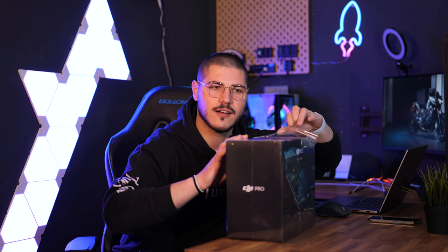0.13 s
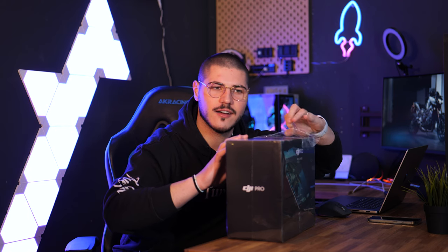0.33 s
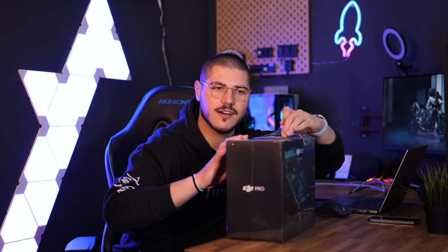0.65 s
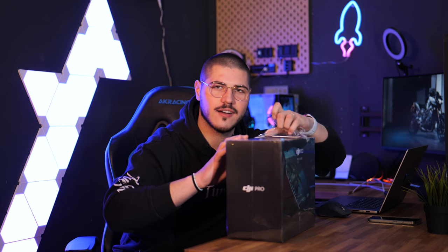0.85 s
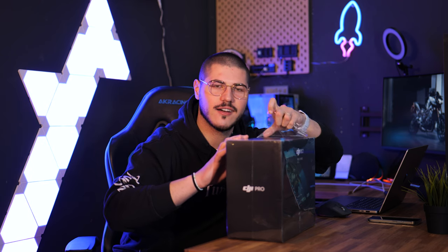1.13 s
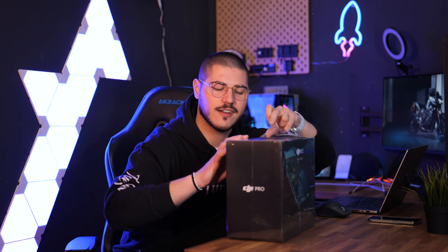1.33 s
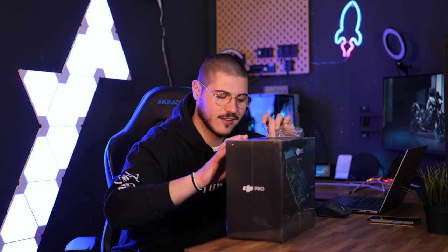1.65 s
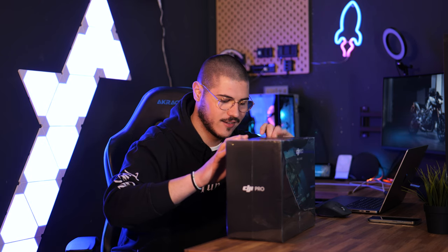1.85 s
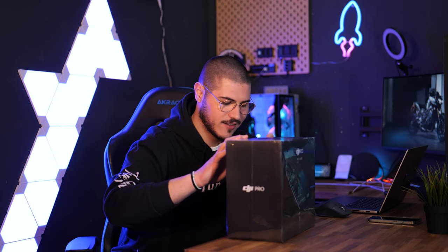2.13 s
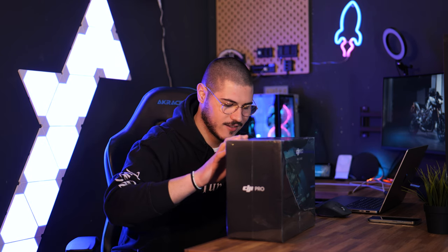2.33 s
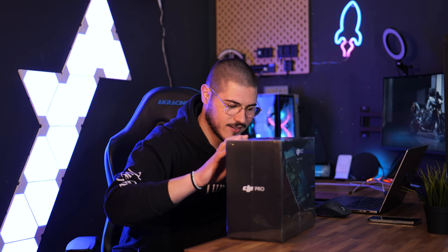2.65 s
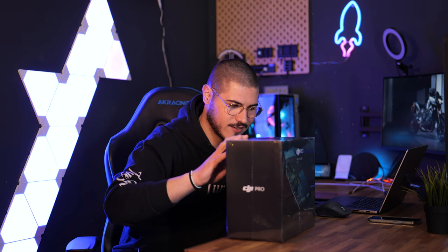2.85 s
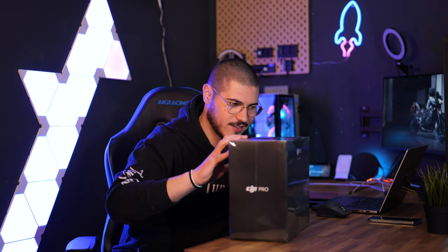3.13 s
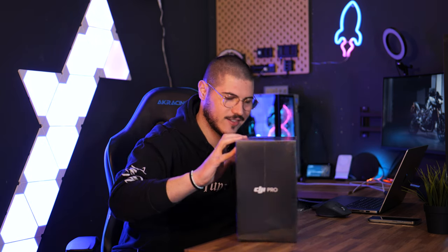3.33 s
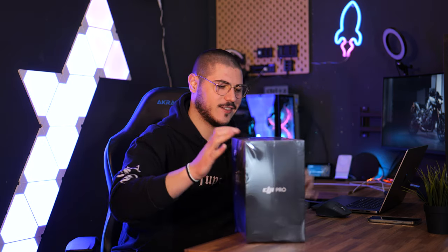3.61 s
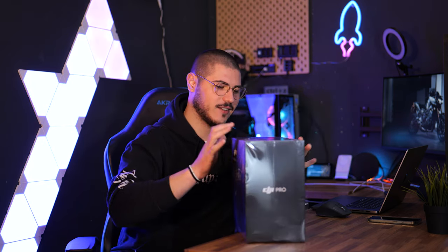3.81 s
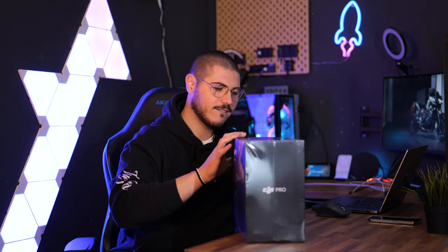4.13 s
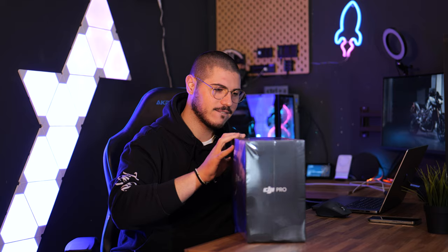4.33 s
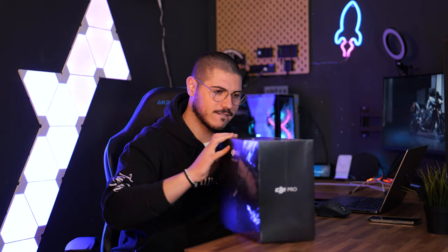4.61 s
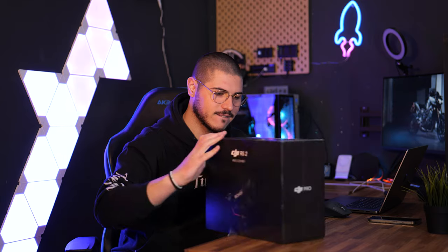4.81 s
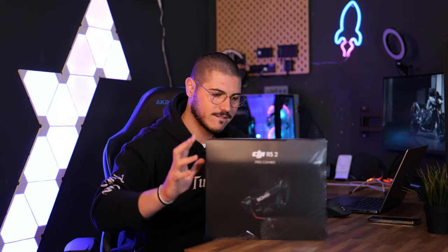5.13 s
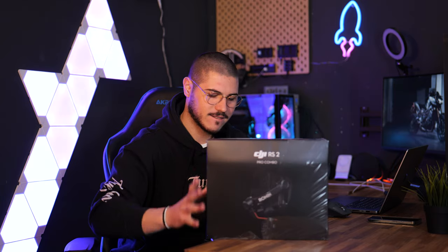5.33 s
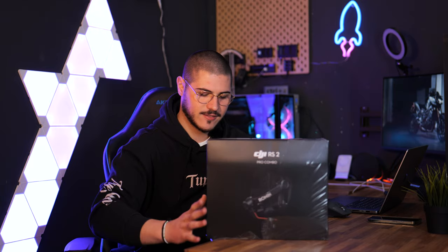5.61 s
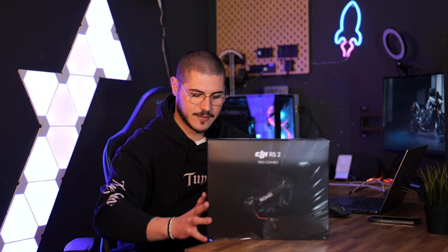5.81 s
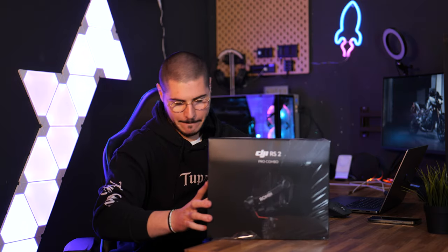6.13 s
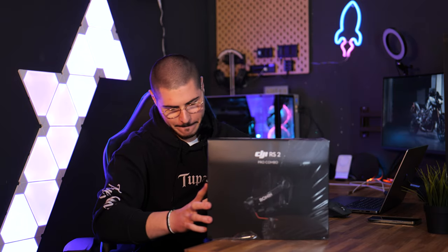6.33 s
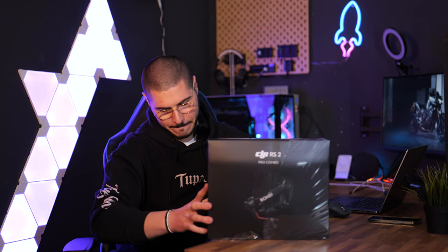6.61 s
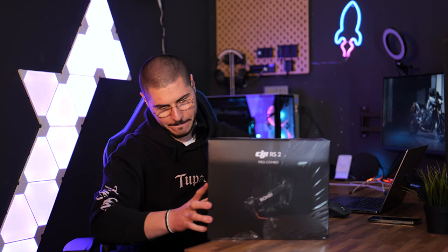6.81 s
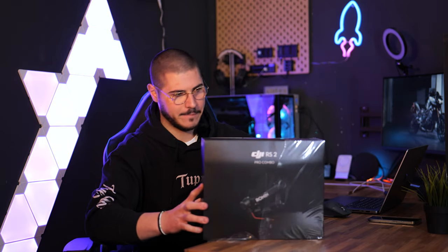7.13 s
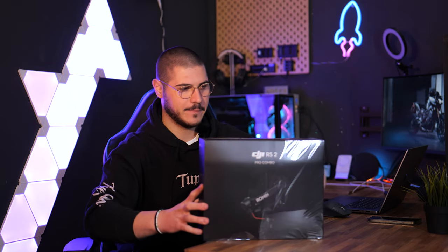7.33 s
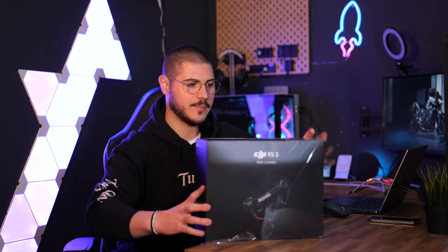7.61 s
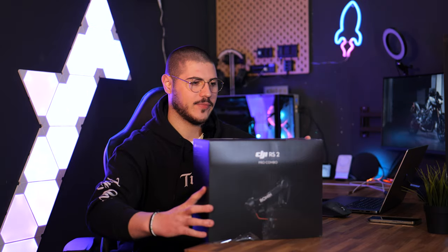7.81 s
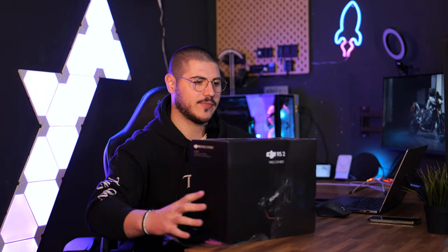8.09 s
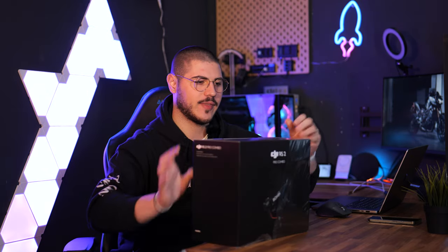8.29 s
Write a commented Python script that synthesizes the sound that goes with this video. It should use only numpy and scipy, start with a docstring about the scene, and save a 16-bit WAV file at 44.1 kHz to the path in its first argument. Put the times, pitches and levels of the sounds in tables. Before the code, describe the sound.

Close to the microphone in a small room, fingers pick at tight plastic wrap on a cardboard box. Bright crinkles and rapid rubbery creaks come first, then irregular crackles and soft hollow knocks. After a quieter patch the film lets go with one very loud, sharp snap and a quick rebound. Looser rustling, a swelling rub and small ticks follow, fading down.

```python
"""Shrink-wrap is picked open and peeled off a cardboard box in a small room, one microphone close by.
The film crinkles throughout in countless tiny ringing buckles, and early on creaks in plucked slips.
Louder cracks and needle-sharp kinks stand out; the stretched film lets go with a sharp snap and rebounds.
The box beneath rustles as filtered buckles and knocks as damped rings that set its modes going.
Behind it lie a short diffuse room tail and quiet filtered noise."""
import sys
import numpy as np
from scipy import signal
from scipy.fft import rfft, irfft, next_fast_len
from scipy.io import wavfile
from scipy.ndimage import uniform_filter1d

SR = 44100
rng = np.random.default_rng(int(sys.argv[2]) if len(sys.argv) > 2 else 0)


def file_out(sig):
    """Save sig as 16-bit WAV at sys.argv[1]."""
    # one column per channel
    cols = np.atleast_2d(sig).T
    # limit, then scale
    lim = np.clip(cols, -1, 1)
    pcm = np.round(lim * 32767).astype(np.int16)
    wavfile.write(sys.argv[1], SR, pcm)


N = 373086

# ring of the film, higher where it is taut: start_s [s], crease_hz [Hz], fold_hz [Hz]
TAUTNESS = [(0, 8160, 2630), (1.1, 8760, 2480), (2.2, 7700, 2920), (2.7, 7040, 1690), (3.6, 6800, 1400),
            (4.3, 7150, 3370), (4.75, 9150, 3340), (5.4, 6900, 3400), (6.3, 7300, 3800), (6.8, 8050, 2800),
            (7.2, 6940, 2040), (8.46, 7000, 2670)]
# steady handling of the wrap: start_s [s], effort_db [dB], crispness_db [dB, creases above folds],
# cardboard_db [dB, above effort]
HANDLING = [(0, -55, 4, -5), (.78, -51, 4.5, -8), (1.55, -44.5, 2.5, -7.5), (1.77, -50, 4.5, -9.5),
            (1.92, -47, -5.5, -2), (2.55, -51, 2.5, 3.5), (3.16, -48, 7.5, -1), (3.25, -54.5, 2.5, 1),
            (3.6, -49.5, 3, -3), (3.93, -66, 3.5, 2.5), (4.25, -54, 0, -5.5), (5.0, -52.5, -7, 0),
            (5.48, -49, -5.5, 1.5), (6.2, -62, -10, -0.5), (6.6, -54.5, -2, -3.5), (7.62, -63.5, 1.5, 1),
            (7.88, -55.5, 3, 2), (8.46, -66.5, 0, -4.5)]
# fingers tugging at the film: start_s [s], length_s [s], effort_db [dB], crispness_db [dB]
TUGS = [(.01, 0.026, -45, 5), (0.104, 0.012, -44.5, 12), (0.197, 0.11, -45, 2.5), (0.328, 0.011, -43.5, 11),
        (0.458, 0.084, -40, -2.5), (0.638, 0.054, -41.5, -2), (0.887, 0.099, -39.5, 3.5),
        (1.006, 0.31, -43.5, 5), (1.592, 0.06, -45, 4.5), (1.868, 0.04, -43, 2), (1.931, 0.017, -39.5, -8),
        (2.079, 0.0092, -39.5, -3), (2.161, 0.0084, -40, -4), (2.252, 0.035, -42, -5.5),
        (2.316, 0.067, -49, -3), (2.764, 0.063, -42, 5), (3.002, 0.082, -44, 1.5),
        (3.334, 0.036, -44.5, 2.5), (5.358, 0.084, -48.5, -4), (5.731, 0.14, -51, -11.5),
        (5.886, 0.026, -40.5, -10.5), (6.72, 0.27, -49, 1), (7.331, 0.12, -51.5, 8), (7.759, .08, -50, 1),
        (7.992, 0.12, -57, 11.5)]
TUG_ATTACK_S, TUG_RELEASE_S = 0.0045, 0.012
# a hand or the table rubbing along the wrap: peak_s [s], half_width_s [s], effort_db [dB], crispness_db [dB]
RUBS = [(3.49, 0.045, -45, 5), (4.24, 0.069, -63, 16), (4.789, 0.038, -42, -1.5), (6.0, 0.02, -55.5, -16),
        (6.44, 0.074, -53, -13), (7.17, 0.1, -41.5, 5.5), (8.24, .055, -46.5, 8)]
# how freely the film slides, rasping at 0 dB and only ticking far below: start_s [s], level_db [dB]
SLIDING = [(0, -12), (.85, -13), (.9, -3), (1.05, -8), (1.25, -3), (2.3, -13), (2.8, -6), (4.2, -4),
           (5.7, -13), (6.3, -9), (6.9, -2), (8.46, -4)]
# ticks per second when sliding is at 0 dB, and the scale of their exponential size spread
TICKS_PER_S, TICK_SPREAD_DB = 1300, 4.4
# spectra of the tight creases, slack folds and cardboard: pitch_hz [Hz], level_db [dB]
CREASE_SPECTRUM = [(1500, -20.5), (4000, -2), (7000, -2.5), (11000, 1), (16000, -5)]
FOLD_SPECTRUM = [(500, -13.5), (1400, -5), (4000, 5.5), (9000, 6), (16000, -1)]
CARDBOARD_SPECTRUM = [(60, -39.5), (200, -3), (350, -3.5), (600, 0), (900, 2.5), (1300, 3.5), (2000, -8.5),
                      (3000, 4), (6000, -54)]
# boom of the box where fingers press on it: start_s [s], level_db [dB, above the cardboard's rustle]
GRIP = [(0, -2), (1.15, 1), (2.8, -9.5), (4.0, -1), (5.7, -14), (6.6, -1), (7.2, -18.5), (7.8, -0.5),
        (8.2, -8.5)]
# spectrum of that boom: pitch_hz [Hz], level_db [dB]
BOOM_SPECTRUM = [(25, -29), (50, -14), (80, -5.5), (160, 1), (260, -0.5), (400, -4), (1000, -33)]
# film sticking and slipping over the lid: start_s [s], length_s [s], first_rate [slips/s],
# last_rate [slips/s], first_level_db [dB], last_level_db [dB], pitch_hz [Hz]
CREAKS = [(0.2268, 0.075, 268, 69, -31, -21, 1860), (0.339, 0.027, 85, 64, -21.5, -26.5, 1810),
          (0.4582, 0.041, 242, 265, -25.5, -27, 2300), (0.5176, 0.0075, 230, 230, -23.5, -29, 2220),
          (0.6128, .0234, 180, 120, -19.5, -34, 3030), (.6498, 0.0078, 240, 200, -23.5, -29, 2570),
          (1.177, 0.055, 160, 135, -32, -28, 2000), (2.258, 0.028, 125, 105, -42, -42, 2200),
          (2.4, 0.058, 38, 38, -29.5, -27.5, 2176)]
CREAK_PITCH_FOLLOWS = 0.14  # the ring rises with the slip rate, by this power
# spectrum of one slip's tick: pitch_hz [Hz], level_db [dB]
SLIP_SPECTRUM = [(50, -21), (200, -21), (700, -4), (1100, 2.5), (1550, 13), (2300, 12.5), (3000, 14.5),
                 (4200, -21), (6500, 7), (9500, -2.5), (16000, -55)]
# single loud buckles: start_s [s], level_db [dB], pitch_hz [Hz]
CRACKS = [(0.0165, -22.5, 2690), (0.1098, -10.5, 8000), (0.1407, -15.5, 9050), (0.2143, -23, 5000),
          (0.2307, -13.5, 8500), (0.4835, -9, 9000), (.5695, -20.5, 2500), (.8532, -21.5, 7200),
          (0.9532, -11.5, 4850), (0.9628, -14, 10200), (0.9895, -10, 8250), (1.0143, -11.5, 9750),
          (1.1335, -11.5, 8400), (1.2724, -10, 7600), (1.2949, -13, 8700), (1.46, -15.5, 8100),
          (1.8079, -14, 3400), (1.9437, -6, 9300), (2.0082, -12, 9000), (2.085, -14.5, 3830),
          (2.1626, -15, 6470), (2.2283, -15, 9900), (2.3667, -19, 7100), (2.5608, -13, 8100),
          (2.6705, -17, 6050), (2.6755, -13.5, 7140), (2.925, -15.5, 9300), (3.1378, -21, 6800),
          (3.4175, -18, 7900), (3.8852, -27.5, 4300), (4.4596, -10, 5070), (4.614, -12.5, 9100),
          (5.099, -17, 8600), (5.108, -17, 4950), (5.1159, -19.5, 2500), (5.9113, -19, 5040),
          (6.306, -18.5, 7000), (6.7311, -14.5, 10000), (7.065, -15, 8300), (7.4023, -15, 7800),
          (7.7004, -22.5, 7060), (8.0742, -21.5, 7340)]
# the wrap snapping and rebounding: start_s [s], level_db [dB], pitch_hz [Hz]
SNAPS = [(5.286, 2, 3990), (5.3535, -5.5, 3820), (5.364, -24, 3860)]
# tiny kinks: how often, level above the creases' effort, spread of level, pitch ratio to the creases, spread
KINKS_PER_S = 24
KINK_DB, KINK_SPREAD_DB, KINK_PITCH, KINK_OCTAVES = 21, 2.5, 1.08, 0.21
# knocks on the box: start_s [s], level_db [dB], pitch_hz [Hz]
KNOCKS = [(0.2986, -31, 960), (0.5702, -37, 400), (0.9524, -26, 970), (1.125, -26.5, 800),
          (1.809, -24.5, 1110), (1.812, -27.5, 210), (2.0842, -23.5, 730), (2.231, -28, 520),
          (2.5172, -22, 607), (2.6704, -22, 900), (4.0094, -37.5, 427), (4.4597, -21.5, 830),
          (4.6149, -23, 815), (5.1149, -22.5, 680), (5.3646, -27, 725), (5.54, -31, 1120),
          (5.751, -31, 510), (6.3084, -28.5, 645), (6.5646, -27.5, 700), (6.569, -34.5, 200),
          (7.7587, -25, 513), (7.761, -30.5, 195)]
# every knock shakes the film: effort relative to the knock's level, crispness, time to settle to 1/e
SHAKE_DB, SHAKE_CRISP_DB, SETTLE_S = -18, -3.5, 0.017
# modes of the hollow box: pitch_hz [Hz], level_db [dB], t60_s [s, time to fall by 60 dB]
BOX_MODES = [(165.3, -25, 0.19), (228, -26.5, 0.12), (345.4, -28, 0.11), (491, -23.5, 0.1),
             (621, -24, 0.11), (1150, -24.5, .1)]
# spectra of the room tail and the room noise: pitch_hz [Hz], level_db [dB]
ROOM_SPECTRUM = [(60, -15), (200, -1), (1000, -3.5), (4000, -2), (9000, -4.5), (16000, -25)]
AIR_SPECTRUM = [(15, -49), (25, -19), (161, 11.5), (7110, -7.5), (16000, -13)]


def crinkle():
    """The same buckles sound in creases, slack folds and cardboard, over a fine rasp of sliding film."""
    t = np.arange(N) / SR
    crease_db, fold_db, card_db = curve(pull(t[::44]), t)  # pull is worked out about every millisecond
    crease_hz, fold_hz = curve(TAUTNESS, t)
    sliding = from_db(curve(SLIDING, t)[0])
    s, sizes = buckles(TICKS_PER_S, TICK_SPREAD_DB, clump_db=4.0, clumps_per_s=71)
    # the more freely the film slides, the more creases flip
    flips = rng.random(len(s)) < np.interp(s, t, sliding)
    s, sizes = s[flips], sizes[flips]
    rasp_s, rasp_sizes = buckles(per_s=4000, spread_db=1.0, clump_db=1.5, clumps_per_s=210)

    def sheet(hz, octaves, cycles, vary_db, spectrum, size):
        """Ticks and rasp ring in one part of the wrap, held near rms 1."""
        ticks = facets(sizes, np.interp(s, t, hz), octaves, cycles, vary_db, size)
        ticks = flutter(s, ticks, share_db=1.0, decay_s=0.0012, count=4)
        rasp_facets = facets(rasp_sizes, np.interp(rasp_s, t, hz), octaves, cycles, vary_db, size)
        rasp = place(rasp_s, rasp_facets)
        ticks = evened(colour(ticks, spectrum), 0.2)
        rasp = evened(colour(rasp, spectrum), 0.2)
        return evened(ticks + sliding * rasp, 0.08)

    crease = sheet(crease_hz, octaves=0.19, cycles=1.4, vary_db=2.5, spectrum=CREASE_SPECTRUM, size=48)
    fold = sheet(fold_hz, octaves=0.63, cycles=0.67, vary_db=4.0, spectrum=FOLD_SPECTRUM, size=64)
    card = sheet(np.full(N, 800.), octaves=0.62, cycles=0.88, vary_db=2.5,
                 spectrum=CARDBOARD_SPECTRUM, size=160)
    boom = evened(colour(place(s, sizes[:, None]), BOOM_SPECTRUM), 0.22) * from_db(curve(GRIP, t)[0])
    film = crease * from_db(crease_db + 2.0) + fold * from_db(fold_db + 0.96)
    return film + (card + boom) * from_db(card_db - 2.47)


def pull(t):
    """Rows (s, creases dB, folds dB, cardboard dB): powers of handling, tugs, rubs and shakes add up."""
    steady_db, steady_crisp_db, contact_db = curve(HANDLING, t)
    moves = [(0.99, steady_db, steady_crisp_db)]
    for s, length, db, crisp_db in TUGS:
        attack = np.clip((t - s) / TUG_ATTACK_S, 0, 1)
        release = np.exp(-np.maximum(t - s - length, 0) / TUG_RELEASE_S)
        moves.append((attack * release, db, crisp_db))
    for s, width, db, crisp_db in RUBS:
        moves.append((np.exp(-((t - s) / width) ** 2 / 2), db, crisp_db))
    for s, db, _ in KNOCKS:
        settling = (t > s) * np.exp(-np.abs(t - s) / SETTLE_S)
        moves.append((settling, db + SHAKE_DB, SHAKE_CRISP_DB))

    def total_db(side):
        """Crispness tilts the effort towards creases (side > 0) or folds (side < 0)."""
        power = sum((shape * from_db(db + side * crisp_db)) ** 2 for shape, db, crisp_db in moves)
        return 10 * np.log10(power)

    crease_db, fold_db = total_db(0.5), total_db(-0.5)
    return np.transpose([t, crease_db, fold_db, (crease_db + fold_db) / 2 + contact_db])


def buckles(per_s, spread_db, clump_db, clumps_per_s):
    """Times and signed sizes of tiny buckles: many small, few large, surging in avalanches."""
    s = np.sort(rng.uniform(0, N / SR, int(per_s * N / SR)))
    knots = np.arange(0, N / SR, 1 / clumps_per_s)
    surge_db = clump_db * np.interp(s, knots, rng.standard_normal(len(knots)))
    size_db = spread_db * np.minimum(rng.exponential(1, len(s)), 3.4)
    return s, from_db(size_db + surge_db) * rng.choice([-1, 1], len(s))


def facets(sizes, hz, octaves, cycles, vary_db, size):
    """Every buckle rings a patch of its own pitch and strength; one row each."""
    pitch, strength = rng.standard_normal((len(sizes), 2)).T
    heights = sizes * from_db(vary_db * strength)
    return rings(hz * 2 ** (octaves * pitch), cycles, size) * heights[:, None]


def creak():
    """Each slip plucks the taut film like a drumhead: a tick and a short ring."""
    s, db, hz = np.transpose(slips())
    tick = colour(signal.unit_impulse(512), SLIP_SPECTRUM)
    tick = tick / np.abs(tick).max()
    shapes = from_db(-3.5) * rings(hz, cycles=1.9, size=512) + from_db(2.5) * tick
    return flutter(s, -from_db(db)[:, None] * shapes, share_db=-5.0, decay_s=0.0014)


def slips():
    """Rows (s, level dB, ring Hz): slip rate and level glide through a creak; faster slips ring higher."""
    rows, way = [], np.linspace(0, 1, 50)
    for s, length, first_rate, last_rate, first_db, last_db, hz in CREAKS:
        rate = first_rate * (last_rate / first_rate) ** way
        done = np.cumsum(rate) - rate[0]
        count = int(round(length * rate.mean())) + 1
        at = np.interp(np.linspace(0, done[-1], count), done, way)
        pitch = hz * (np.interp(at, way, rate) / rate.mean()) ** CREAK_PITCH_FOLLOWS
        rows += zip(s + length * at, first_db + (last_db - first_db) * at, pitch)
    return rows


def cracks():
    """A big crease flips: a short ring, and a duller pop from the sheet around it."""
    s, db, hz = np.transpose(CRACKS)
    pop = from_db(-15.5) * rings(hz * 0.43, cycles=0.51, size=256)
    shapes = rings(hz, cycles=1.0, size=256) + pop
    return flutter(s, from_db(db)[:, None] * shapes, share_db=1.5, decay_s=0.0022)


def snaps(swell_s=0.00042):
    """A panel of film whips over: cycles swell and die in a millisecond, with a bright edge and hollow pop."""
    s, db, hz = np.transpose(SNAPS)
    t = np.arange(256) / SR
    whip = np.sin(2 * np.pi * hz[:, None] * t) * np.exp(-((t - swell_s) / 0.00016) ** 2 / 2)
    edge = from_db(-12.0) * rings(hz * 1.6, cycles=0.78, size=256)
    pop = from_db(-25.5) * rings(hz * 0.35, cycles=0.89, size=256)
    return flutter(s, from_db(db - 1.5)[:, None] * (whip + edge + pop), share_db=-3.5, decay_s=0.00162)


def kinks():
    """Lone needle-sharp ticks from tight creases, louder the harder the film is pulled."""
    s = rng.uniform(0, N / SR, int(KINKS_PER_S * N / SR))
    strength, pitch = rng.standard_normal((len(s), 2)).T
    db = pull(s)[:, 1] + KINK_DB + KINK_SPREAD_DB * strength
    hz = curve(TAUTNESS, s)[0] * KINK_PITCH * 2 ** (KINK_OCTAVES * pitch)
    ticks = place(s, from_db(db)[:, None] * rings(hz, cycles=1.9, size=96))
    # a patch this small radiates only treble
    return signal.sosfilt(signal.butter(2, 5200, "high", fs=SR, output="sos"), ticks)


def knocks():
    """A cardboard wall gives a dead, heavily damped knock and a short, higher rattle."""
    s, db, hz = np.transpose(KNOCKS)
    rattle = from_db(-4.5) * rings(hz * 4.7, cycles=1.0, size=2048)
    wall = rings(hz, cycles=0.76, size=2048) + rattle
    knock = flutter(s, wall * from_db(db - 2.5)[:, None], share_db=1.0, decay_s=0.0052)
    # the knock carries little bass below about 135 Hz
    return signal.sosfilt(signal.butter(2, 135, "high", fs=SR, output="sos"), knock)


def box_ring():
    """Every knock sets the hollow box's modes ringing, each with a strength of its own."""
    s, db, _ = np.transpose(KNOCKS)
    t = np.arange(SR // 4) / SR
    modes = np.array([from_db(level_db - 60 * t / t60) * np.sin(2 * np.pi * hz * t)
                      for hz, level_db, t60 in BOX_MODES])
    strength_db = db[:, None] + 3.5 * rng.standard_normal((len(s), len(modes)))
    return place(s, from_db(strength_db) @ modes)


def room_tail(wrap):
    """The small room answers with a short diffuse tail, its spectrum shaped by a filter."""
    return from_db(-10.0) * colour(diffuse(wrap, t60=0.48, delay=0.0043), ROOM_SPECTRUM)


def room_air():
    """Quiet steady room noise: white noise filtered to the room's spectrum."""
    air = colour(rng.standard_normal(N), AIR_SPECTRUM)
    return from_db(-63) * air / air.std()


def flutter(s, shapes, share_db, decay_s, count=16):
    """Bending waves return from the edges of each patch, at other delays for every flip."""
    wait, toss = rng.standard_normal((len(s), 2, count)).transpose(1, 2, 0)
    delay = 0.0005 + decay_s * np.abs(wait)
    gain = from_db(share_db) * np.sign(toss) * np.exp(-delay / decay_s / 2) / np.sqrt(count)
    returns = sum(place(s + d, shapes * g[:, None]) for d, g in zip(delay, gain))
    return place(s, shapes) + returns


def rings(hz, cycles, size):
    """One damped sine per pitch, height 1, its envelope falling to 1/e in the given cycles."""
    turns = np.minimum(hz, SR / 3)[:, None] * np.arange(size) / SR
    shapes = np.sin(2 * np.pi * turns) * np.exp(-turns / cycles)
    return shapes / np.abs(shapes).max(axis=1, keepdims=True)


def place(s, shapes):
    """Sum short sounds (rows) at their start times."""
    at = np.maximum(np.asarray(s) * SR, 0).astype(int)[:, None] + np.arange(shapes.shape[1])
    return np.bincount(at.ravel(), shapes.ravel(), N)[:N]


def diffuse(x, t60, delay):
    """A dense dying noise tail, scaled to unit energy, follows every sound."""
    t = np.arange(int((t60 + delay) * SR)) / SR
    tail = rng.standard_normal(len(t)) * from_db(-60 * t / t60) * (t > delay)
    return signal.fftconvolve(x, tail / np.linalg.norm(tail))[:N]


def colour(x, points):
    """Causal (minimum-phase) filter with the given spectrum."""
    size = next_fast_len(len(x) + 4096, real=True) // 2 * 2
    hz, db = np.transpose(points)
    bins_hz = np.arange(size // 2 + 1) * SR / size
    log_gain = np.log(from_db(np.interp(np.log(bins_hz + 1), np.log(hz), db)))
    # folding the cepstrum onto positive times makes the phase minimal
    cepstrum = irfft(log_gain)[:size // 2]
    cepstrum[1:] *= 2
    return irfft(rfft(x, size) * np.exp(rfft(cepstrum, size)))[:len(x)]


def evened(x, seconds):
    """Bring the running rms to about 1."""
    size = int(seconds * SR / 2)
    power = uniform_filter1d(uniform_filter1d(x * x, size), size)
    return x / np.sqrt(np.abs(power) + 1e-12)


def curve(rows, s):
    """Each column of a table, interpolated at the given times."""
    times, *columns = np.transpose(rows)
    return [np.interp(s, times, column) for column in columns]


def from_db(db):
    """Decibels to an amplitude factor."""
    return 10 ** (np.asarray(db) / 20)


def scene():
    """The wrap and box close by, a short room tail and quiet room noise."""
    wrap = crinkle() + creak() + cracks() + snaps() + kinks() + knocks() + box_ring()
    return (wrap + room_tail(wrap) + room_air())[None]


def record(dry):
    """The microphone signal: rumble is cut, peaks beyond full scale clip, and the very top is cut."""
    rumble_cut = signal.butter(3, 68, "high", fs=SR, output="sos")
    clipped = np.clip(signal.sosfilt(rumble_cut, dry), -1, 1)
    top_cut = signal.ellip(8, 0.3, 70, 16000, fs=SR, output="sos")  # ripple dB, stopband dB, cutoff Hz
    return signal.sosfilt(top_cut, clipped)


dry = scene()
out = record(dry)
file_out(out)
```